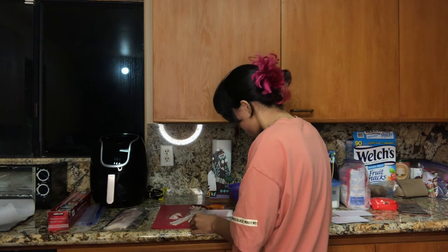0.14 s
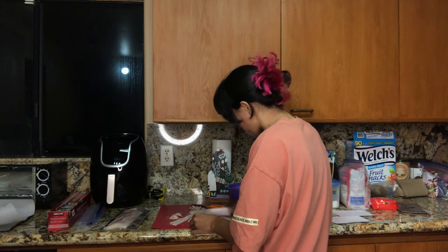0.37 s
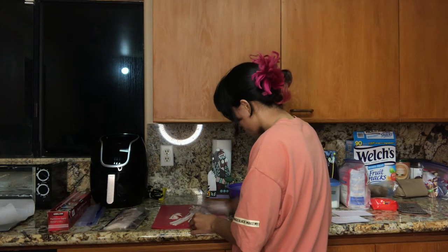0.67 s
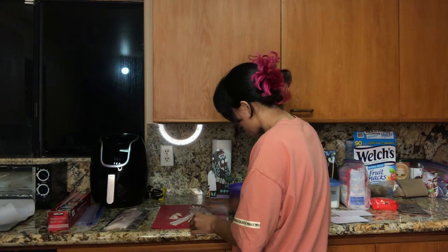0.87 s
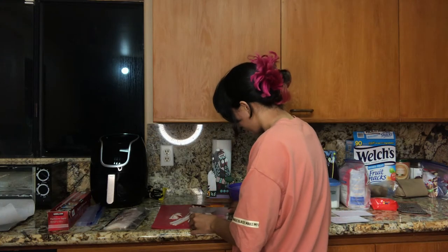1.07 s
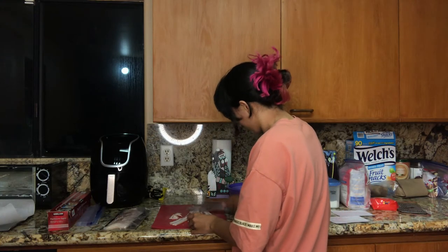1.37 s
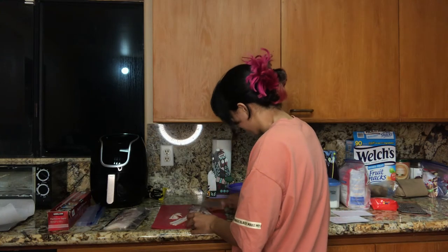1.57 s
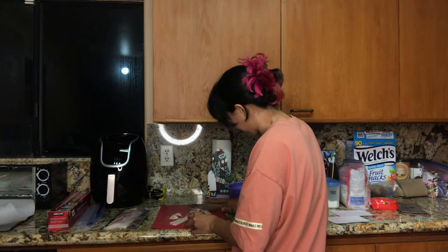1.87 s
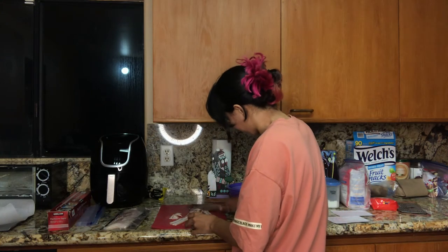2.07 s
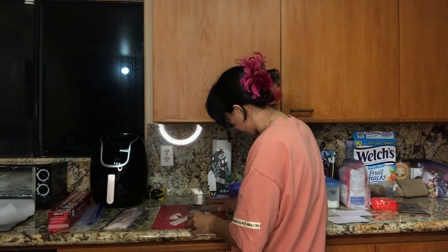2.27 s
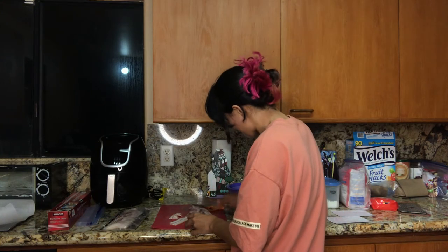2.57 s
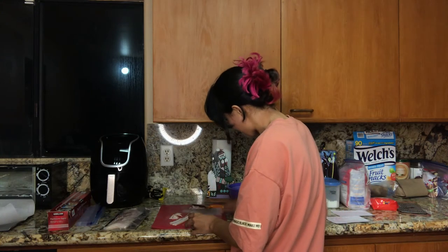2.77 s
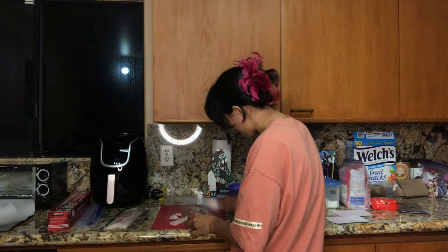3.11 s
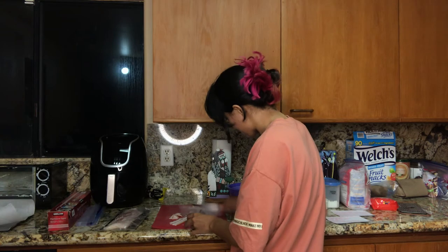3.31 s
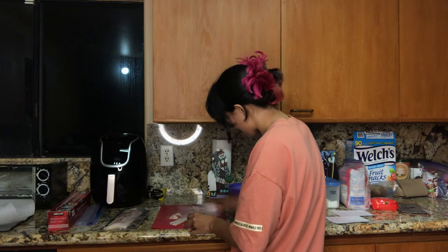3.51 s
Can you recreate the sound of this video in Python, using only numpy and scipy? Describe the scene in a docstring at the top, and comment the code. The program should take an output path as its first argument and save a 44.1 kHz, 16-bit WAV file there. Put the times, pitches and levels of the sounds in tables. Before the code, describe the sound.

Knife chopping meat on a counter, about five steady strokes a second, in a live kitchen.

```python
"""A knife chops meat on a thin mat on a stone kitchen counter, a few steps from the microphone.
It opens in the ring of a stroke just before the start; about five strokes a second follow.
Each stroke is a bright tick of the edge (coloured clicks), then some ms later a slap of the mat and
a thud of the counter (coloured pushes); the hard kitchen rings on after each (decaying modes and
random echoes). The slaps are hardest near 1.3 s and faintest near 2 s. A quiet room hush lies under all."""
import sys
import numpy as np
from scipy import signal
from scipy.fft import rfft, irfft
from scipy.io import wavfile

SR = 44100
rng = np.random.default_rng(int(sys.argv[2]) if len(sys.argv) > 2 else 0)


def dump_mix(stems):
    """Bounce the given channels to the path in sys.argv[1] as a 16-bit WAV at rate SR."""
    frames = np.atleast_2d(stems).T  # one column per channel
    limited = np.clip(frames, -1, 1)  # hard clip at full scale
    pcm = np.round(limited * 32767).astype(np.int16)
    wavfile.write(sys.argv[1], SR, pcm)


def ratio_of_db(decibels):
    """Turn decibels (scalar or array-like) into linear amplitude factors; 0 dB maps to 1."""
    return 10 ** (np.asarray(decibels, float) / 20)


N = 160965  # length [samples]
LEAD = 8820  # run-in for strokes before the start [samples], cut off in scene()


def ticks(count=5):
    """The edge lands: a few uneven direct clicks within some ms, and their echoes off the kitchen."""
    # edge meets the mat: (time [s], crackle level [dB], treble level [dB], crackle tilt [dB per octave])
    landings = [(-.09, -34, -43, -5), (0.1049, -37.5, -41.5, -0.5), (0.2978, -34.5, -43, 0.5),
                (0.4796, -30, -38.5, -1.5), (0.6714, -34, -38, -1), (0.8652, -35, -39.5, -2.5),
                (1.0467, -31, -35.5, -1), (1.26, -39, -40, -3.5), (1.4534, -35.5, -41, 2.5),
                (1.6511, -40.5, -50.5, -6.5), (1.818, -56.5, -59, 7), (1.8424, -43.5, -52.5, -5),
                (2.0009, -52.5, -54.5, -2), (2.204, -38.5, -46, -2), (2.396, -39, -45, -3.5),
                (2.586, -35, -41, 0), (2.7598, -33, -41, -5.5), (2.9335, -33, -36, -2),
                (3.1178, -34, -38, -2.5), (3.3097, -37.5, -39, -2), (3.5043, -35.5, -40.5, 1.5)]
    # spectrum of the crackle: (frequency [Hz], relative level [dB])
    crackle = [(150, -69), (500, -3), (800, -8.5), (1300, -6), (1730, -0.5), (2740, 1), (4380, -0.5),
               (5010, -4.5), (5800, -3), (8000, -10.5), (11000, -28.5), (17000, -56)]
    # spectrum of the treble: (frequency [Hz], relative level [dB])
    treble = [(3000, -38.5), (5000, -13), (7000, -3.5), (10500, -2), (13400, -0.5), (15600, -0.5),
              (16200, -42), (17200, -12)]
    build_s, mean_delay_s, size_spread_db = 0.0014, 0.0025, 14
    crackle_clicks_db, treble_clicks_db = -5.5, -4  # clicks against their echoes
    mix = np.zeros(N + LEAD)
    for s, crackle_db, treble_db, tilt_db in landings:
        when, size, sign = rng.random((3, count))
        echoes = room(build_s)
        # the first click comes at once, the others after exponential random delays
        delay_s = -np.log(1 - np.r_[0, when[1:]]) * mean_delay_s
        clicks = np.zeros(SR // 2)
        clicks[(delay_s * SR).astype(int)] = np.sign(sign - 0.5) * ratio_of_db(size_spread_db * size)
        clicks = unit(clicks)
        crackle_pulse = colour(crackle, tilt_db, uneven())
        add(mix, s, strike(crackle_db, crackle_pulse, echoes + ratio_of_db(crackle_clicks_db) * clicks))
        add(mix, s, strike(treble_db, colour(treble), echoes + ratio_of_db(treble_clicks_db) * clicks))
    return mix


def uneven(count=24):
    """Chance humps and hollows, so each stroke favours other bands: (frequency [Hz], level [dB])."""
    hz = np.geomspace(100, SR / 2, count)
    return np.c_[hz, 2.5 * rng.standard_normal(count)]


def blows():
    """The mat is driven onto the counter: each blow is a slap of the mat and a slower thud."""
    # slap onsets: (time [s], slap level [dB], thud level [dB],
    # slap tilt [dB per octave], thud tilt [dB per octave])
    impacts = [(-.075, -42, -31.5, 2, -5), (.121, -31.5, -33.5, 1.5, 1.5), (.315, -37.5, -34, -5.5, -1.5),
               (.494, -30.5, -31, -3, 0.5), (.686, -26.5, -31.5, 0, 4.5), (0.883, -27.5, -31, 0, 3.5),
               (1.056, -20.5, -28.5, 4, 0), (1.271, -19, -26.5, 4, 0), (1.467, -22.5, -28, 1, 1.5),
               (1.656, -29, -30.5, -4, -2.5), (1.845, -30.5, -32, -1, 0), (2.012, -58, -40.5, -5, -9.5),
               (2.218, -38, -36, -5.5, 10.5), (2.409, -43.5, -33.5, -3.5, -1.5),
               (2.598, -46.5, -33.5, -4, -0.5), (2.77, -42, -32, -8, -2), (2.946, -43, -32.5, 0.5, 0),
               (3.131, -33.5, -30.5, 2.5, -1.5), (3.323, -49, -36, -5, -3), (3.515, -40, -33, -8.5, 1)]
    # spectrum of the slap: (frequency [Hz], relative level [dB])
    slap = [(300, -23.5), (445, -23.5), (485, 5), (800, 2), (1000, 1.5), (1350, -7), (1550, -12),
            (2500, -22), (4000, -29), (8000, -42), (13000, -114)]
    # spectrum of the thud: (frequency [Hz], relative level [dB])
    thud = [(24, -38), (60, -24), (87, -4.5), (170, -4.5), (250, -1.5), (310, -6), (390, -11.5), (440, -15),
            (600, -38), (1000, -82.5)]
    thud_lead_s = 0.0018  # the thud sets in this much before the slap
    mix = np.zeros(N + LEAD)
    for s, slap_db, thud_db, slap_tilt_db, thud_tilt_db in impacts:
        slap_response = counter(build_s=0.00069, direct_db=-16, echo_db=-0.5)
        add(mix, s, strike(slap_db, colour(slap, slap_tilt_db), slap_response))
        thud_response = counter(build_s=0.0016, direct_db=-6.5, echo_db=-3.5, peak_s=0.00601)
        add(mix, s - thud_lead_s, strike(thud_db, colour(thud, thud_tilt_db), thud_response))
    return mix


def counter(build_s, direct_db, echo_db, peak_s=0):
    """One direct push at peak_s, echoes, and decaying modes, each caught a little differently."""
    # counter and cabinets ring: (frequency [Hz], least relative level [dB], t60 [s])
    modes = [(88.1, -0.5, 0.23), (121, -7.5, 0.15), (149.6, -4.5, 0.16), (183.7, -9, .2), (211.8, -2, 0.21),
             (248.5, -3, 0.26), (302.9, -2, 0.22), (388.7, -1.5, 0.39), (474.3, 1.5, 0.18), (558, 2, 0.15),
             (659, -2, 0.26), (789, -3, 0.25), (856, -7.5, 0.28), (920, 7, 0.15), (996, -1.5, 0.31),
             (1089, -5, 0.29), (1241, 1.5, 0.42), (1356, 0, 0.25), (1410, 1, 0.2), (1477, 4.5, 0.15)]
    ring_db, catch_spread_db = -14.5, 4
    t = np.arange(SR // 2) / SR
    catch = rng.random(len(modes))
    ring = np.zeros(len(t))
    for (hz, db, t60), c in zip(modes, catch):
        ring += ratio_of_db(db + catch_spread_db * c - 60 * t / t60) * np.sin(2 * np.pi * hz * t)
    ring = unit(ring * (1 - np.exp(-t / build_s)))
    direct = -ratio_of_db(direct_db) * (np.arange(len(t)) == round(peak_s * SR))
    return direct + ratio_of_db(echo_db) * room(build_s) + ratio_of_db(ring_db) * ring


def strike(db, pulse, response):
    """A coloured pulse through a response; db is its rms over the first 40 ms."""
    x = signal.fftconvolve(pulse, response)
    return ratio_of_db(db) * x / np.std(x[:round(0.04 * SR)])


def colour(spectrum, tilt_db=0, humps=((0, 0), (1, 0)), size=4096):
    """Causal minimum-phase impulse with the given spectrum, tilted per octave, with humps added."""
    hz = abs(np.fft.fftfreq(size, 1 / SR))
    gain_db = np.maximum(read(spectrum, hz), -80) + read(humps, hz) + tilt_db * np.log2(hz + 40)
    # the Hilbert transform of the log gain gives the phase
    response = np.exp(np.conj(signal.hilbert(np.log(ratio_of_db(gain_db)))))
    return unit(np.fft.ifft(response).real[:size // 2])


def room(build_s):
    """Dense echoes, other for every call: they build up, then a quick part and a tail die band by band."""
    # kitchen decay: (frequency [Hz], t60 [s])
    decay = [(60, 0.29), (160, 0.29), (420, 0.48), (1100, 0.37), (2900, 0.41), (7700, 0.35), (15000, 0.24)]
    early_db, early_t60_s = -2.5, 0.046  # quick part against the tail, and its extra decay
    taps = np.zeros(SR // 2)
    at = np.arange(0, len(taps) - 12, 12)
    # one echo of random sign at a random place in every 12 samples
    taps[at + rng.integers(0, 12, len(at))] = rng.choice([-1., 1.], len(at))
    hz, t, z = signal.stft(taps, SR, nperseg=256)
    z = z * ratio_of_db(-60 * t / read(decay, hz)[:, None])
    tail = signal.istft(z, SR, nperseg=256)[1][:len(taps)]
    t = np.arange(len(taps)) / SR
    build = 1 - np.exp(-t / build_s)
    return unit(tail * build * (1 + ratio_of_db(early_db - 60 * t / early_t60_s)))


def add(mix, s, sound):
    """Mixes a sound in at time s [s]."""
    part = mix[LEAD + round(s * SR):][:len(sound)]
    part += sound[:len(part)]


def read(points, hz):
    """Table value on a log-frequency axis."""
    f, value = np.transpose(points)
    return np.interp(np.log(hz + 1), np.log(f + 1), value)


def unit(x):
    """Scales a sound to energy one."""
    return x / np.sqrt(np.sum(x ** 2) + 1e-30)


def hush():
    """Steady low room noise: white noise shaped by a spectrum, at -48 dB rms."""
    # spectrum of the hush: (frequency [Hz], relative level [dB])
    hush_spectrum = [(15, -44), (30, -7), (55, -1), (87, -1.5), (240, -5), (590, -18.5), (1100, -17),
                     (1500, -22), (3300, -32.5), (5000, -35), (10000, -37.5), (15700, -41), (16500, -60)]
    gain = ratio_of_db(read(hush_spectrum, np.fft.rfftfreq(N, 1 / SR)))
    noise = irfft(rfft(rng.standard_normal(N)) * gain, N)
    return ratio_of_db(-48) * unit(noise) * np.sqrt(N)


def scene():
    """Ticks and blows in the kitchen over the hush, in one channel."""
    strokes = (ticks() + blows())[LEAD:]
    return (strokes + hush())[None]


def top_cut(x):
    """Nothing passes above the cut-off."""
    return signal.sosfilt(signal.butter(12, 16990, fs=SR, output="sos"), x)


def record(dry):
    """Takes the finished mix at the microphone to its recorded form."""
    return top_cut(dry)


dry = scene()
out = record(dry)
dump_mix(out)
```